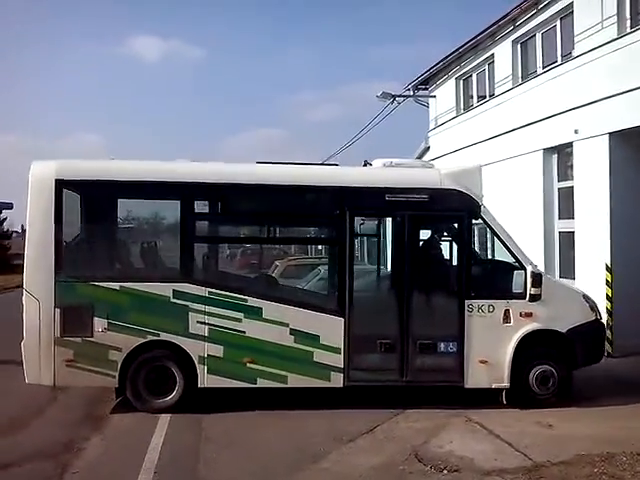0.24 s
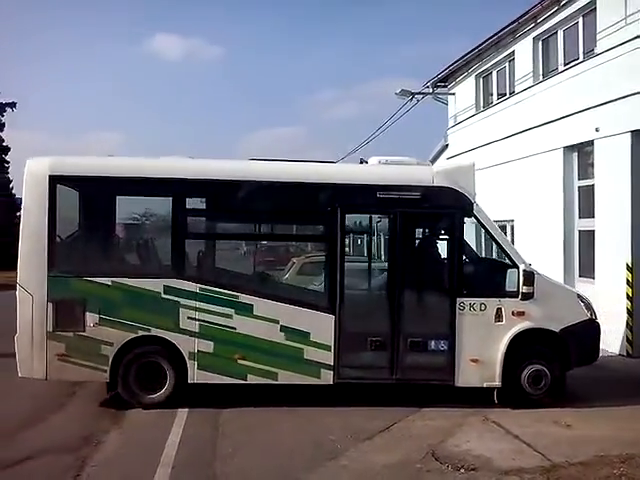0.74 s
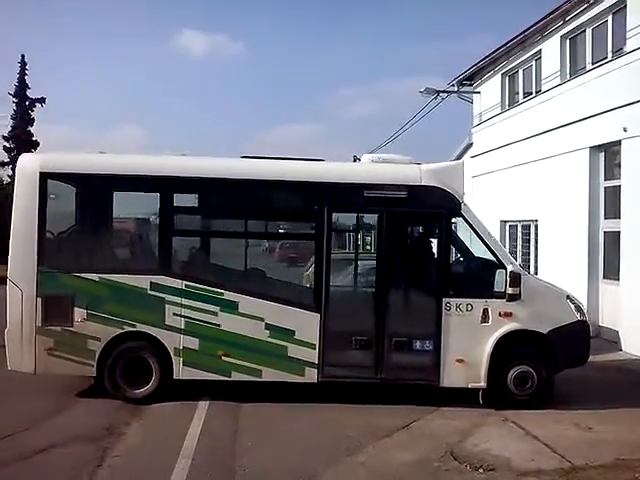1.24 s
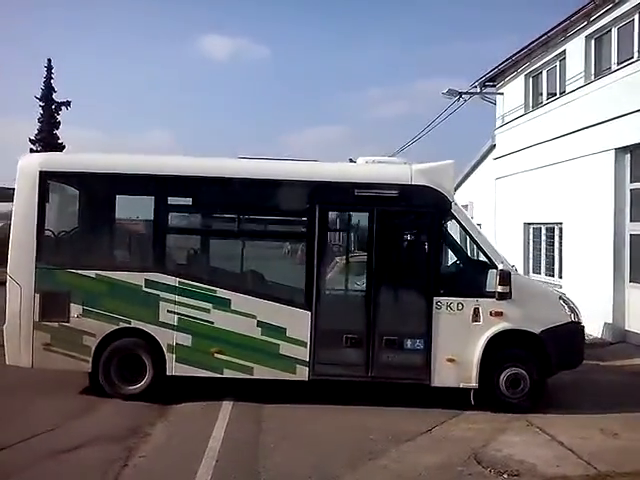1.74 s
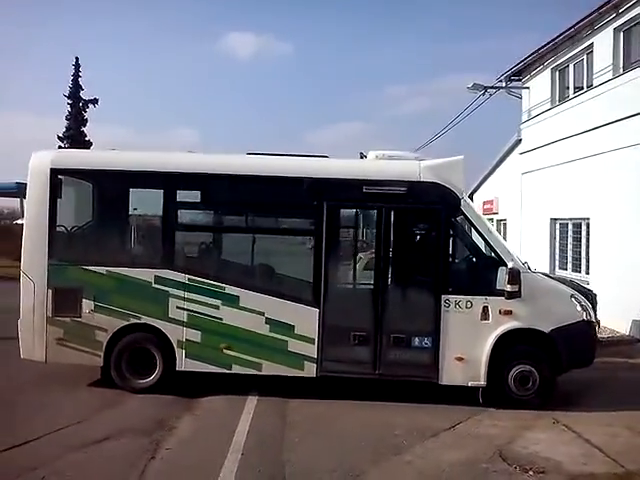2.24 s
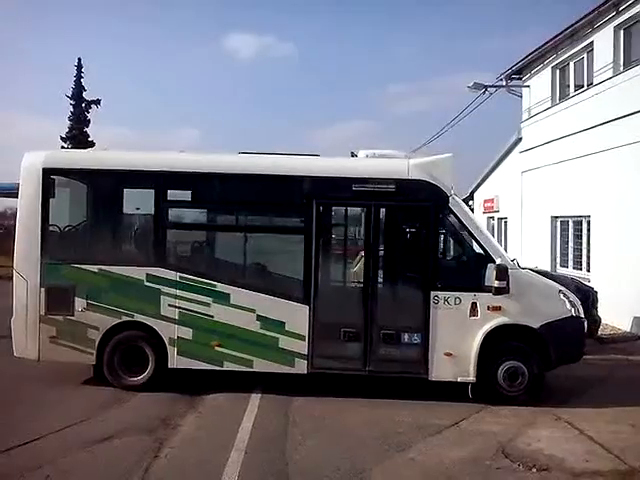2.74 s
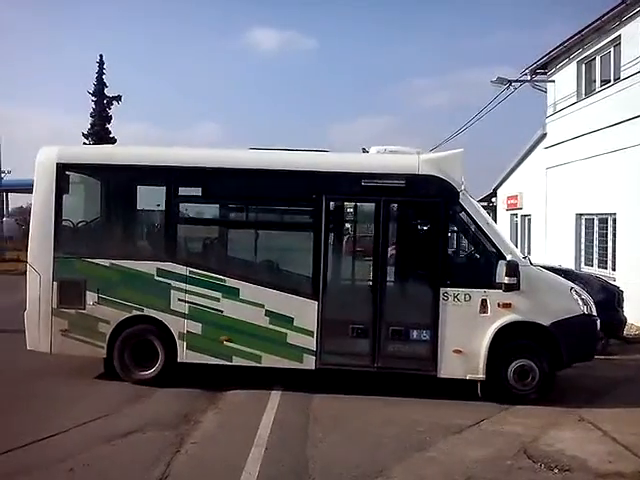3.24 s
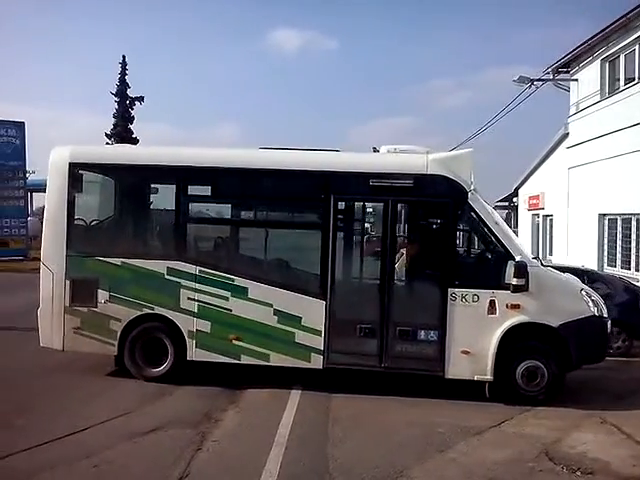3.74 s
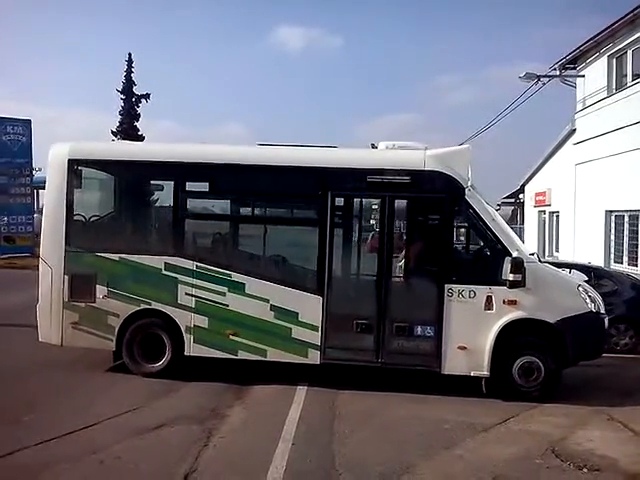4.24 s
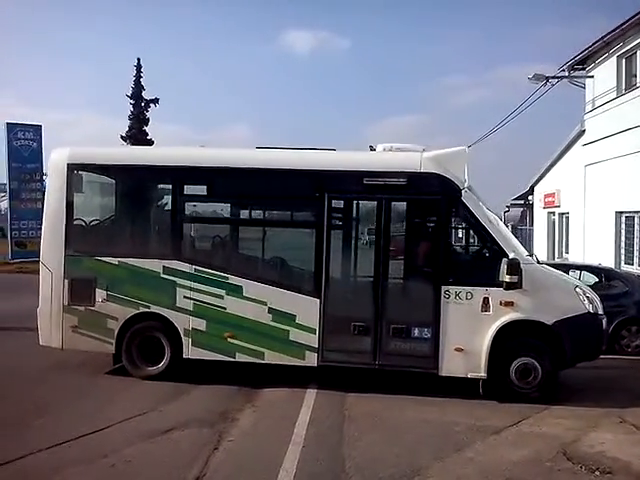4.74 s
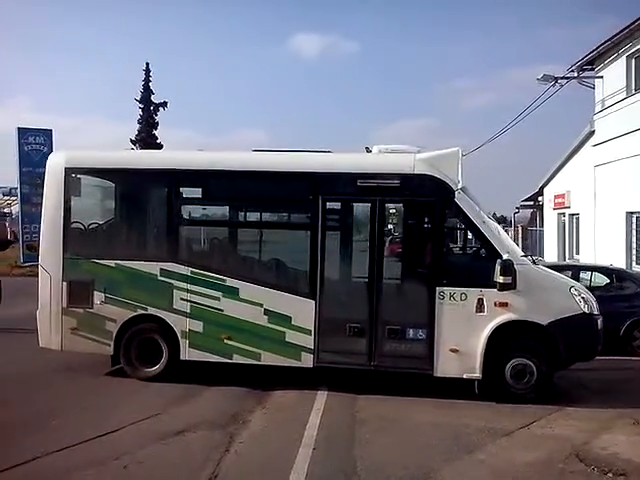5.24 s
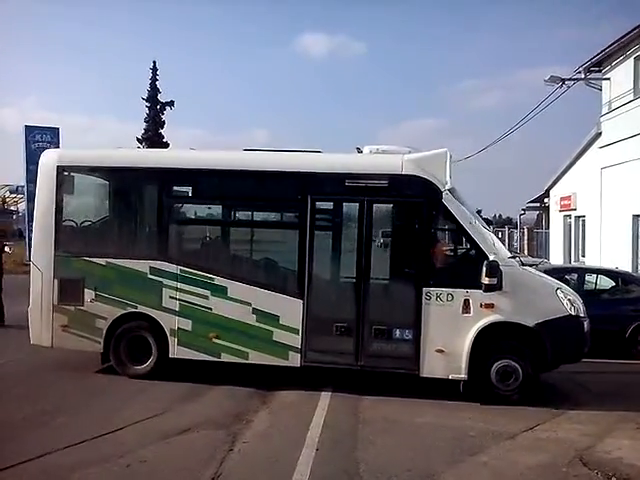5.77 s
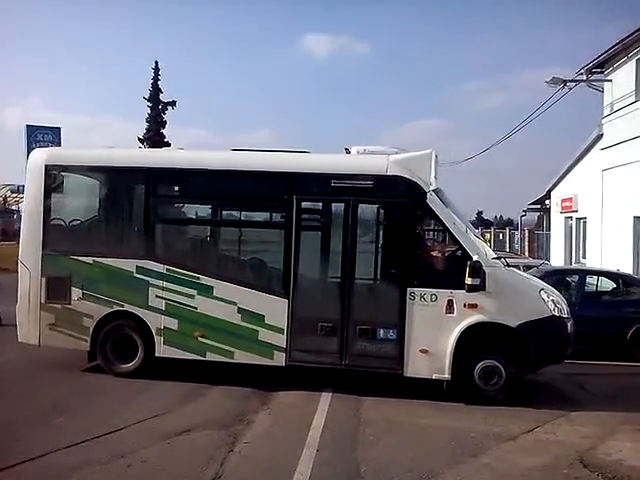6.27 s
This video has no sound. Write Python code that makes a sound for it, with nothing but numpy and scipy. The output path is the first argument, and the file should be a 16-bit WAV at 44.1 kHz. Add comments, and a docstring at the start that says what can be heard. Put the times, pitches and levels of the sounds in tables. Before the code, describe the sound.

Close outdoor pickup of a small bus rolling past at low speed. The coarse, breathy noise of tyres and cooling air dominates, fluttering slightly, over a deep humming drive. Body panels thump over a bump after about a second, and grit clicks under the tread. Then a hollow roar and wavering whine swell and die, the hiss drops away, and a dull hum remains in the open yard. The mono sound is slightly muffled.

```python
"""A minibus rolls slowly out of a garage and past, across an asphalt yard.
Its drive hums in gliding sines under the shaped noise of the tyres and the rush of the cooling air.
A second rotor, the blower, drones and whines; bumps ring the body panels and grit scrapes under the tread.
As it turns away the hiss fades, the hollow body drones, and the yard's steady noise comes forward.
"""
import sys
import numpy as np
from scipy import signal
from scipy.fft import rfft, irfft, next_fast_len
from scipy.io import wavfile
from scipy.ndimage import map_coordinates

SR = 44100
rng = np.random.default_rng(int(sys.argv[2]) if len(sys.argv) > 2 else 0)


def master_out(mix):
    """Clip the mix to full scale and print it as 16-bit PCM to the path in sys.argv[1]."""
    frames = np.transpose(np.atleast_2d(mix))
    ceiling = np.clip(frames, -1, 1)
    pcm = np.round(ceiling * 32767).astype(np.int16)
    wavfile.write(sys.argv[1], SR, pcm)


N = 287091  # samples, about 6.5 s


def amp(db):
    """Decibels to gain."""
    return np.exp(np.asarray(db) * (np.log(10) / 20))


def unit(x):
    """Scale to rms 1."""
    return x / np.sqrt(np.mean(x ** 2) + 1e-20)


def curves(rows):
    """One value per sample for each column after the time, joined by straight lines."""
    times, *columns = np.transpose(rows)
    return [np.interp(np.arange(N) / SR, times, column) for column in columns]


def hump(s, half_length):
    """A smooth rise from 0 to 1 and back, centred on s."""
    return np.exp(-((np.arange(N) / SR - s) / half_length) ** 2)


def surges(rows):
    """Summed gain in dB from rows of (time [s], half length [s], gain [dB])."""
    return sum(db * hump(s, half) for s, half, db in rows)


def swell(s, db, rise, fall):
    """Gain that climbs to db at s and dies away, both in dB a second."""
    t = np.arange(N) / SR - s
    return amp(db + np.minimum(rise * t, -fall * t))


def wobble(rate):
    """A smooth random curve, rate knots a second."""
    coarse = np.arange(0, N, 64)
    knots = rng.standard_normal(2048)
    curve = map_coordinates(knots, [coarse * rate / SR], mode="wrap")
    return np.interp(np.arange(N), coarse, curve)


def noise(colour):
    """Noise of rms 1 with a gain that is a function of frequency."""
    m = next_fast_len(N, real=True)
    hz = np.arange(m // 5) * SR / m  # the bins above a fifth of SR stay empty
    real, imag = rng.standard_normal((2, len(hz)))
    spectrum = (real + 1j * imag) * colour(hz)
    return unit(irfft(spectrum.astype(np.complex64), m)[:N])


def shaped(spectrum):
    """Noise of rms 1 with the colour of (frequency [Hz], level [dB]) points and none beyond them."""
    f, db = np.transpose(spectrum)
    return noise(lambda hz: amp(np.interp(np.log(hz + 1), np.log(f), db, left=-120, right=-120)))


def phase(hz):
    """Running angle of a steady or gliding frequency, from a random start."""
    turns = np.cumsum(np.broadcast_to(hz / SR, N)) + rng.random()
    return (2 * np.pi * (turns - np.floor(turns))).astype(np.float32)


def tone(hz, waver_db):
    """A slightly unsteady sine of rms 1."""
    return unit(np.sin(phase(hz)) * amp(waver_db * wobble(8.3)))


def resonance(centre_hz, width_hz):
    """Turbulence in one resonance: two slow noises on a carrier whose pitch may move."""
    bell = lambda hz: 1 / (1 + (hz / width_hz) ** 2) ** 2
    angle = phase(centre_hz)
    return noise(bell) * np.cos(angle) + noise(bell) * np.sin(angle)


# the drive's hum, four pulses to a shaft turn: (time [s], pitch [Hz])
HUM_PITCH = [(0, 75.04), (.3, 75.3), (.8, 73.6), (1.4, 74.2), (2.2, 75.68), (3.35, 77.32), (4.55, 80),
             (5.2, 80.9), (6.5, 84.5)]
# the drive's load, heard as the strength of its hum: (time [s], level [dB])
HUM_LEVEL = [(0, -27), (.2, -37), (.5, -30), (.9, -28.5), (1.15, -33.5), (1.35, -32), (1.6, -34.5),
             (2.2, -38.5), (3.1, -39.5), (4.7, -38), (5.4, -44), (6.5, -45)]
# overtones: (multiple of the hum [ratio], relative level [dB], lift by the garage mouth [dB])
HUM_OVERTONES = [(2, 1, 12), (2.76, -1, -4), (3, 5, 2.5), (3.52, -9.5, 20), (3.75, -2, -4.5), (4, -5, 9)]
# the overtones growl as the drive pulls: (time [s], half length [s], gain [dB])
PULLS = [(1.6, 0.85, 6)]
# the garage mouth colours the overtones: (time [s], half length [s])
GARAGE = (0.16, 0.23)
# the fifth shaft order comes through late: (peak time [s], level [dB], rise [dB/s], fall [dB/s])
FIFTH_SWELL = (4.5, -40, 13, 2)
OVERTONE_DB, OVERTONE_FADE_DB_PER_S = -44, 3.5  # base level at the garage door; steady loss


def drive():
    """The turning drive hums at its pulse rate, with overtones that fade as it turns away."""
    pitch, = curves(HUM_PITCH)
    hum_db, = curves(HUM_LEVEL)
    hum = amp(hum_db) * tone(pitch, waver_db=1.0)
    doorway = hump(*GARAGE)
    overtones = sum(
        amp(db + lift_db * doorway) * tone(multiple * pitch, waver_db=2.0)
        for multiple, db, lift_db in HUM_OVERTONES)
    overtone_db = OVERTONE_DB - OVERTONE_FADE_DB_PER_S * np.arange(N) / SR + surges(PULLS)
    fifth = tone(pitch * 5 / 4, waver_db=1.5)
    return hum + amp(overtone_db) * overtones + swell(*FIFTH_SWELL) * fifth


# bands of the roar coloured by the road's texture: (centre [Hz], width [Hz])
TEXTURE_BANDS = [(850, 120), (1150, 110), (1450, 160), (1780, 220), (2150, 240)]
TEXTURE_DB, TEXTURE_RATE = 0.25, 11  # depth; knots a second


def textured(x):
    """Each band of the roar swells and sinks on its own as the tread meets new asphalt."""
    hz, t, z = signal.stft(x, SR, nperseg=512)
    drift = lambda: np.interp(t * SR, np.arange(N), wobble(TEXTURE_RATE))
    pattern = sum(
        np.exp(-((hz[:, None] - centre) / width) ** 2) * drift()
        for centre, width in TEXTURE_BANDS)
    return unit(signal.istft(z * amp(TEXTURE_DB * pattern), SR, nperseg=512)[1][:N])


# colour of the wheels' rumble: (frequency [Hz], relative level [dB])
RUMBLE = [(25, -26.5), (45, -9), (62, -9.5), (100, -3), (160, -3), (250, -2.5), (380, -4), (520, -8.5),
          (900, -32.5)]
# colour of the tread's roar: (frequency [Hz], relative level [dB])
TREAD = [(250, -36.5), (480, -13), (660, -1.5), (960, 1), (1230, -0.5), (1600, 0.5), (2050, -0.5),
         (2450, -8), (2900, -20.5), (4000, -30)]
# colour of the tread's hiss: (frequency [Hz], relative level [dB])
HISS = [(1500, -36.5), (2600, 2.5), (3400, -0.5), (4300, 0), (5200, -4), (6100, -8.5), (7000, -11),
        (8000, -30)]
# the tyre noise swells and briefly dips: (time [s], half length [s], gain [dB])
TYRE_SURGES = [(.38, .14, 1.5), (1.35, 0.062, 2.5), (1.91, 0.052, 2), (2.1, .05, 1.5), (3.72, 0.16, -0.5),
               (3.94, 0.12, 3.5), (4.27, 0.16, 1)]
# the rumble swells in the garage mouth, then in the turn: (time [s], half length [s], gain [dB])
RUMBLINGS = [(.1, 1.6, 5.5), (4.8, .6, 3)]
RUMBLE_DB, TREAD_DB, HISS_DB = -36.5, -23.5, -35  # base levels, with the bus close
RUMBLE_FADES = 0.49  # dB for each dB of passing
HISS_FADES, HISS_SURGES = 1.73, 1.9  # dB for each dB of passing, of surge


def tyres(passing_db):
    """Rough asphalt shakes the wheels; the tread roars and hisses, fluttering with the surface."""
    surge_db = surges(TYRE_SURGES)
    surface_db = surge_db + 0.5 * wobble(60)
    rumble_db = RUMBLE_DB + RUMBLE_FADES * passing_db + surges(RUMBLINGS) + 0.93 * surge_db
    rumble = amp(rumble_db) * shaped(RUMBLE)
    tread = amp(TREAD_DB + passing_db + surface_db) * textured(shaped(TREAD))
    hiss_flutter_db = HISS_SURGES * surface_db + 0.72 * wobble(200)
    hiss = amp(HISS_DB + HISS_FADES * passing_db + hiss_flutter_db) * shaped(HISS)
    return rumble + tread + hiss


# overlapping bands of airy noise swell and fade at various pitches:
# (time [s], half length [s], centre [Hz], width [Hz], level [dB])
RUSHES = [(.15, 0.19, 149, 45, -37), (0.404, 0.72, 988.5, 339.7, -32.5), (0.652, 0.3, 431.5, 139.5, -36.5),
          (0.846, 0.19, 1553, 527, -29), (1.372, 0.15, 1330, 560, -31), (1.452, 0.34, 4890, 955, -38),
          (1.65, 0.31, 1038, 240, -36), (2.1, 0.5, 214.5, 40, -42), (1.932, 0.15, 1832, 299, -33),
          (2.203, 0.38, 4290, 1053, -39), (2.46, 0.28, 1777, 560, -28), (2.95, 0.18, 2146, 396, -32.5),
          (2.95, 0.34, 521, 90, -41), (3.048, 0.49, 260.7, 59.86, -44), (3.152, .2, 2473, 404, -39),
          (3.1, 0.27, 4810, 1100, -45.5), (3.246, 0.52, 1449, 281, -29.5), (3.38, 0.4, 1798, 418, -32.5),
          (3.6, 0.1, 1850, 298, -31.5), (3.947, 0.091, 1000, 380, -32), (4.48, .15, 950, 300, -37.5),
          (4.36, 0.24, 2095, 560, -36), (4.253, .45, 2904, 955, -42), (4.75, 0.87, 159.9, 70, -42.5),
          (5.5, 0.55, 2654, 944, -45.5)]
SIZZLE_HZ, SIZZLE_DB = 6835, -47  # fine air noise; base level, with the bus close
SIZZLE_HIDDEN_S, SIZZLE_FADE_DB_PER_S = 3.46, 14  # when the body starts to shield it, and how fast


def air(passing_db):
    """Cooling air rushes in overlapping bands of turbulent noise, with a fine sizzle on top."""
    pitch, = curves(HUM_PITCH)
    # the flow throbs once a shaft turn and with each pulse of the drive
    turn = phase(pitch / 4)
    pulse = phase(pitch)
    throb = amp(0.47 * np.sin(turn) + 1.0 * np.sin(pulse))
    shield_db = SIZZLE_FADE_DB_PER_S * np.maximum(np.arange(N) / SR - SIZZLE_HIDDEN_S, 0)
    sizzle_db = SIZZLE_DB + 2.1 * passing_db - shield_db
    sizzle = amp(sizzle_db) * resonance(SIZZLE_HZ, width_hz=660)
    rush = sum(
        amp(db) * hump(s, half) * resonance(hz, width)
        for s, half, hz, width, db in RUSHES)
    return throb * (rush + sizzle)


# dips that sweep through the rush as the angle changes:
# (time [s], half length [s], centre [Hz], glide [Hz/s], width [Hz], depth [dB])
DIPS = [(.5, 0.67, 1290, -55.5, 111, 2), (0.936, 0.25, 3540, -600, 420, 6.5), (1.7, 0.64, 555, -81, 172, 5),
        (2.082, 0.35, 2530, -330, 260, 3), (2.055, 0.46, 6120, -200, 284, 6.5),
        (2.303, 0.43, 1330, -100, 130.5, 2), (3.296, 0.49, 720, -81.5, 118.6, 4),
        (4.003, 1.1, 365, -0.5, 65.5, 2)]


def dipped(x):
    """Reflections partly cancel narrow bands, each gliding as it deepens and fills again."""
    hz, t, z = signal.stft(x, SR, nperseg=1024)
    for s, half, centre, glide, width_hz, depth_db in DIPS:
        offset = (hz[:, None] - centre - glide * (t - s)) / width_hz
        z = z * amp(-depth_db * np.exp(-((t - s) / half) ** 2 - offset ** 2))
    return signal.istft(z, SR, nperseg=1024)[1][:N]


# the blower's pitch falls as it winds down: (time [s], pitch [Hz])
DRONE_PITCH = [(1.3, 103), (2.9, 99.86), (3.35, 95.4), (3.95, 91.93), (4.8, 89.7), (5.75, 87.4),
               (6.5, 84.7)]
# the body booms with the blower: (time [s], half length [s], level [dB])
BOOMS = [(1.35, 0.14, -38.5), (4.16, 0.3, -31.8), (4.848, 0.17, -38), (5.8, 0.24, -48)]
# the blower's half order throbs in the body: (time [s], half length [s], level [dB])
THROB = (3.75, 0.63, -44)
# the whine comes and goes: (time [s], half length [s], multiple of the pitch [ratio], level [dB])
WHINE = [(3.077, 0.18, 5, -39.5), (3.983, .22, 5.38, -37), (4, .09, 7.5, -41), (4.12, .2, 6.5, -38.5),
         (4.36, 0.22, 6, -42), (4.75, .33, 5, -43), (5.2, .45, 5.5, -46.5)]
DRONE_DB = -48  # base level of the steady part, with the bus close
WHINE_WAVER = 0.00608  # scale of the random drift, as a share of its pitch


def blower(passing_db):
    """A second rotor winds down beside the drive; the body booms with it and its high orders whine."""
    pitch, = curves(DRONE_PITCH)
    booms = sum(amp(db) * hump(s, half) for s, half, db in BOOMS)
    drone_gain = amp(DRONE_DB + 0.25 * passing_db) + booms
    throb_s, throb_half, throb_db = THROB
    throb = amp(throb_db) * hump(throb_s, throb_half) * tone(pitch / 2, waver_db=0.5)
    strand = lambda k: tone(k * pitch * (1 + WHINE_WAVER * wobble(14)), waver_db=2.0)
    whine = sum(amp(db) * hump(s, half) * strand(k) for s, half, k, db in WHINE)
    return drone_gain * tone(pitch, waver_db=2.0) + throb + whine


# lesser hums of pumps and fans:
# (time [s], half length [s], pitch at that time [Hz], glide [Hz/s], level [dB])
SIDE_HUMS = [(0, 1.1, 111.7, 6.5, -39.5), (.2, .7, 62.5, 2, -39.5), (2, .9, 62.1, 3.5, -41),
             (3.046, 1.2, 70.94, -1.3, -38.5), (3.401, 2, 127, -1, -52.5), (4.498, 2, 276.4, 0, -52),
             (5.2, 1.3, 45, -1, -52.5), (5.348, 0.72, 554.6, 0, -48), (5.498, 0.78, 68.7, -1.2, -42.5)]


def auxiliaries():
    """Pumps and fans hum in overlapping swells, most of them gliding in pitch."""
    t = np.arange(N) / SR
    return sum(
        amp(db) * hump(s, half) * tone(hz + glide * (t - s), waver_db=2.5)
        for s, half, hz, glide, db in SIDE_HUMS)


# colour of the yard's background: (frequency [Hz], relative level [dB])
YARD = [(30, -25), (60, -9.5), (100, -5), (160, 0), (240, -8.5), (350, -12.5), (550, -5.5), (750, -10),
        (1500, -12), (2300, -12), (3700, -21), (6800, -30), (7500, -49)]


def yard():
    """The open yard's steady background, as shaped noise."""
    return amp(-39.0) * shaped(YARD)


# bumps in the paving: (time [s], level [dB], hardness [dB per octave])
KNOCKS = [(0.072, -29, 10.5), (1.274, -25, 4), (1.328, -20.5, -4), (2.514, -27.5, -8)]
# modes of the body panels: (frequency [Hz], relative level [dB], time to fall 60 dB [s])
PANELS = [(72.7, -2, 0.28), (97.7, 2.5, 0.18), (159.4, -1, 0.31), (189, -18, 0.096), (299, -4.5, 0.067)]


def knocks():
    """Each bump rings the body panels' decaying modes; a harder one favours the higher modes."""
    out = np.zeros(N + SR)
    t = np.arange(SR // 2) / SR
    onset = 1 - np.exp(-t / 0.0039)
    for s, db, hardness in KNOCKS:
        ring = sum(
            amp(level + hardness * np.log2(hz / 100) - 60 * t / t60) * np.sin(2 * np.pi * hz * t)
            for hz, level, t60 in PANELS)
        out[round(s * SR):][:len(t)] += amp(db) * ring * onset
    return out[:N]


# grit under the tread: (time [s], level [dB], centre [Hz], width [Hz], length [s])
SCUFFS = [(1.099, -36, 6010, 1800, .003), (1.18, -46, 3800, 1500, 0.013), (1.402, -27, 1090, 300, 0.004),
          (1.449, -30, 6000, 1800, 0.001), (1.496, -29.5, 6000, 1700, 0.00092),
          (2.09, -44, 6300, 1500, .022), (5.236, -56.5, 6200, 1100, .012), (6.41, -47, 5400, 1900, 0.013)]


def scuffs():
    """Grit scrapes under the tread in short bursts of band noise."""
    out = np.zeros(N + 2 * SR)
    t = np.arange(SR) / SR - 0.5  # each burst peaks mid-buffer
    hz = np.arange(SR // 2 + 1)
    for s, db, centre, width, length in SCUFFS:
        band = 1 / (1 + ((hz - centre) / width) ** 2) ** 2
        grain = unit(irfft(rfft(rng.standard_normal(SR)) * band))
        out[round(s * SR):][:SR] += amp(db) * np.exp(-0.5 * (t / length) ** 2) * grain
    return out[SR // 2:][:N]


# the hollow under the body shifts as the bus moves off: (time [s], centre [Hz])
HOLLOW_PITCH = [(3, 510.4), (4, 515), (4.7, 481.5), (6.5, 490.7)]
# its roar: (peak time [s], level [dB], rise [dB/s], fall [dB/s])
HOLLOW_SWELL = (4, -34, 6, 8.5)


def hollow():
    """The hollow under the body roars as one moving resonance, swelling and dying away."""
    hz, = curves(HOLLOW_PITCH)
    return swell(*HOLLOW_SWELL) * resonance(hz, width_hz=130)


# the rolling noise falls as the bus turns away: (time [s], level [dB])
PASSING = [(0, 0), (.8, 0), (2.2, -2), (3.1, -2.5), (3.6, -4.5), (4.5, -4.5), (4.9, -8.5), (5.5, -12),
           (6.5, -11)]


def scene():
    """The minibus over the steady background of the yard; reflections thin its tyre and air noise."""
    passing_db, = curves(PASSING)
    rushing = dipped(tyres(passing_db) + air(passing_db))
    machinery = drive() + blower(passing_db) + auxiliaries()
    mix = machinery + rushing + yard() + knocks() + scuffs() + hollow()
    return mix[None]


def record(dry):
    """Thins the deep bass and rolls off steeply around 7.6 kHz."""
    m = next_fast_len(N + SR // 4, real=True)
    hz = np.fft.rfftfreq(m, 1 / SR)
    bass_cut = 1 - 1 / (1 + (hz / 36) ** 5)
    band_limit = 1 / np.sqrt(1 + np.exp((hz - 7600) / 70))
    return irfft(rfft(dry, m) * bass_cut * band_limit, m)[:, :N]


dry = scene()
out = record(dry)
master_out(out)
```